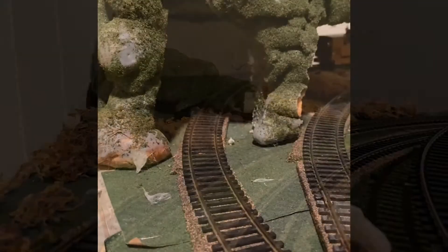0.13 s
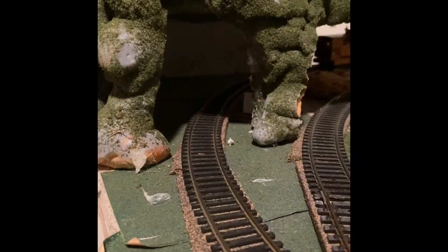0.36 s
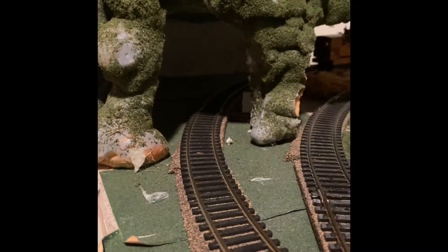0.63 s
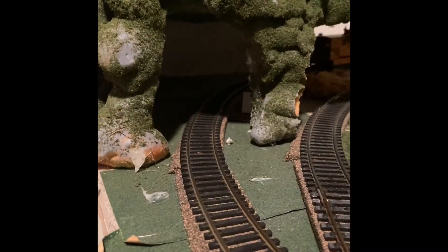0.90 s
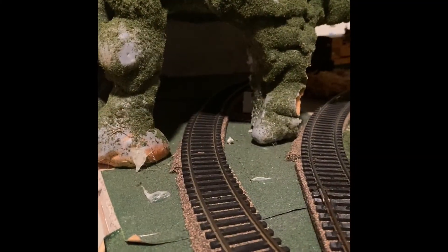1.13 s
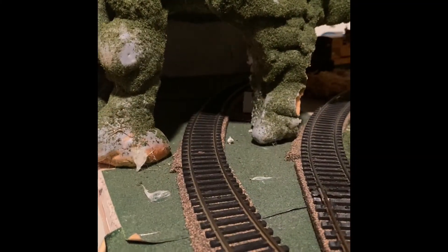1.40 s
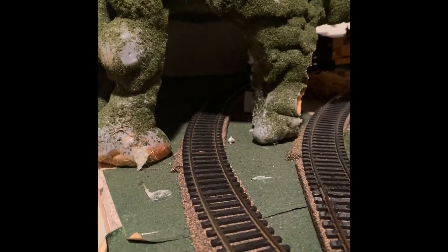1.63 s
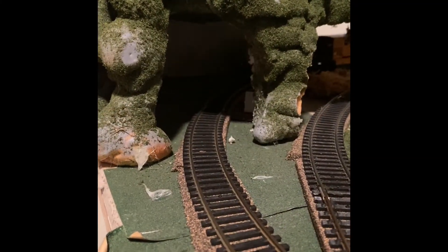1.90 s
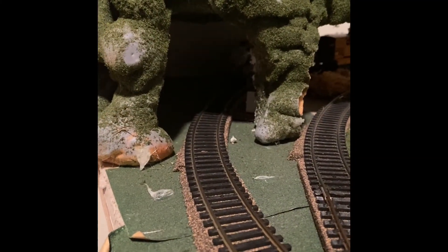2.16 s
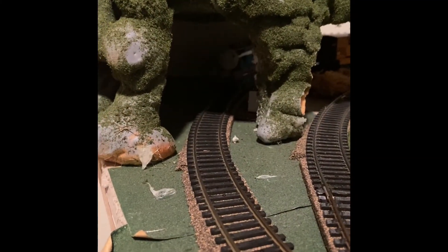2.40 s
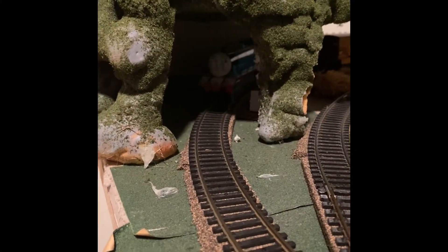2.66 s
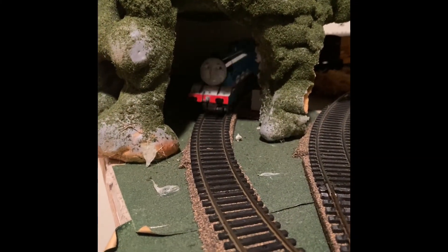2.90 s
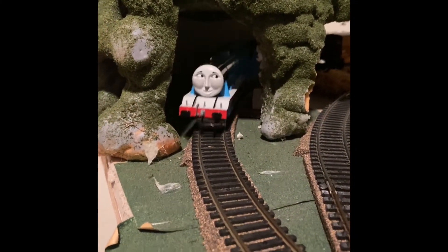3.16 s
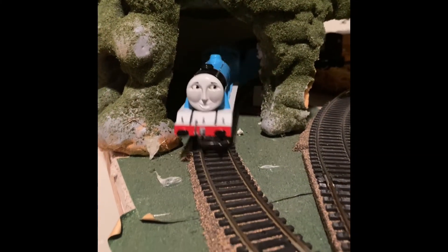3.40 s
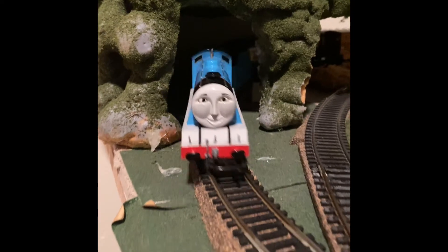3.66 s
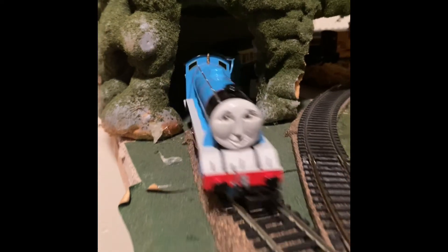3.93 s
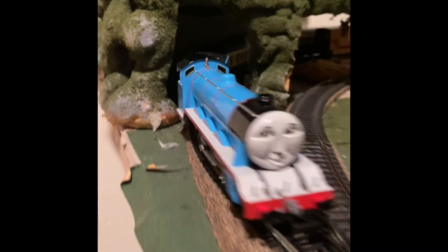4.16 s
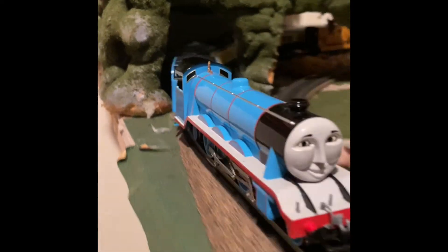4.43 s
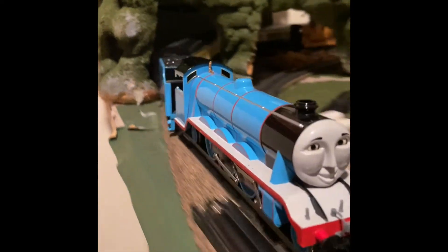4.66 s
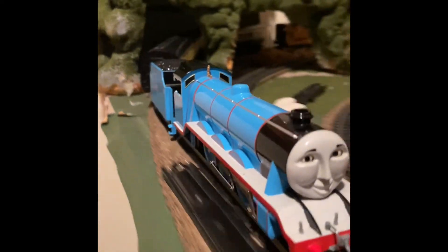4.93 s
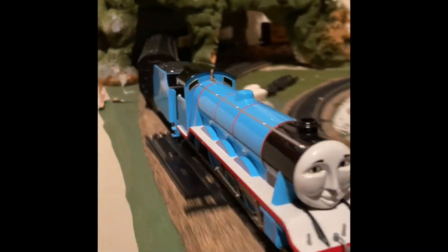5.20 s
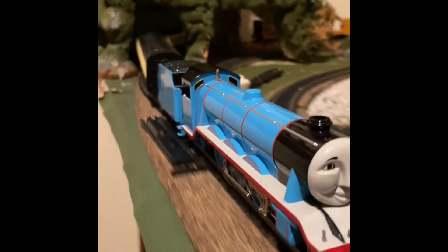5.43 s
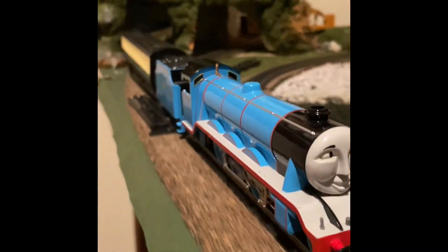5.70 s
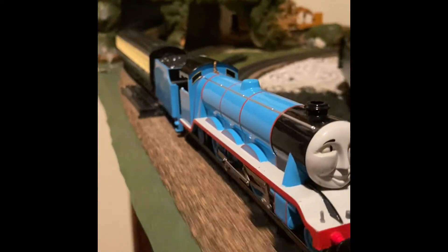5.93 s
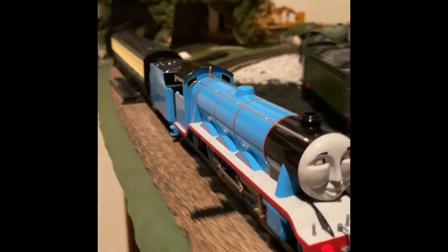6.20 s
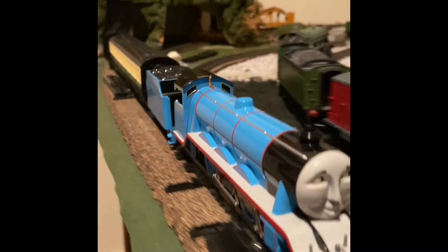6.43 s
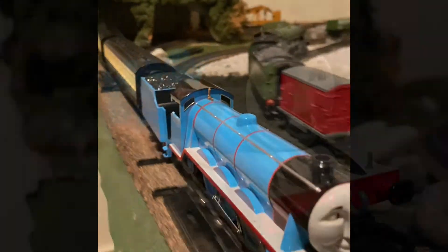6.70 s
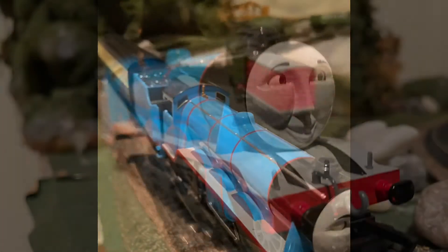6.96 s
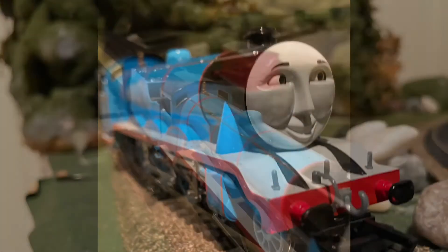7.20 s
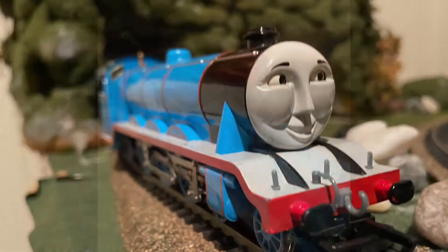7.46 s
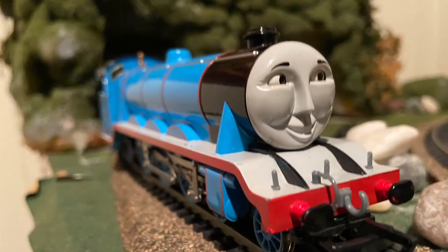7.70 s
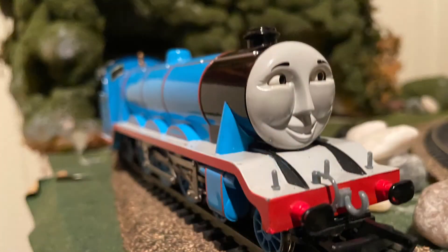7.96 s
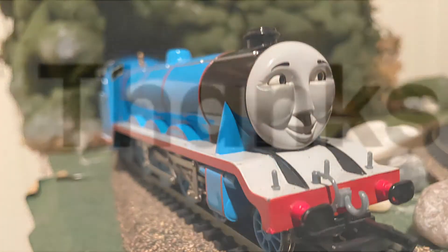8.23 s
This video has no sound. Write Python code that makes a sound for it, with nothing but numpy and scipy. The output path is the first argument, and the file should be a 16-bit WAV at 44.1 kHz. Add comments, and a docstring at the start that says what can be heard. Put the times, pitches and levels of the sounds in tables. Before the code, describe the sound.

A small electric model train approaches on an indoor wooden layout, soft rumble growing into brighter rolling hiss with crisp ticks and clanks, then quickly fading.

```python
"""Model train on a wooden layout

A small electric locomotive and its carriages draw near on an indoor baseboard, then fade out.
Rolling is coloured noise pulsed by small contacts: board rumble and drone, wheel roar, rail hiss.
Rail joints tick, and jolts and clanks ring resonant modes of wheels, frame, shell, board and table.
Random grains rattle, a faint motor hum comes and goes, and a diffuse hiss fades out at the start.
Left and right differ in level, likeness and phase along the spectrum; a short room tail follows hits.
"""
import sys
import numpy as np
from scipy import signal
from scipy.fft import rfft, irfft, next_fast_len
from scipy.io import wavfile
from scipy.ndimage import uniform_filter1d

SR = 44100
rng = np.random.default_rng(int(sys.argv[2]) if len(sys.argv) > 2 else 0)


def inscribe(sig):
    """Save sig as 16-bit PCM at rate SR to the path in sys.argv[1].

    A 1-D sig is mono; a 2-D sig holds one channel per row.
    Samples are clipped to [-1, 1] before scaling.
    """
    pcm = np.round(np.clip(np.atleast_2d(sig).T, -1, 1) * 32767)
    wavfile.write(sys.argv[1], SR, pcm.astype(np.int16))


def linear_from_db(decibels):
    """Turn decibels (scalar or array-like) into linear amplitude factors; 0 gives 1."""
    return 10 ** (np.asarray(decibels, float) / 20)


N = 367926

# train drawing near: t/s, rolling roar level/dB, rail hiss level/dB
TRAIN_LEVELS = [(0.0, -45.5, -61), (0.2, -46, -60), (1.2, -44.5, -59), (1.6, -43.5, -56), (2.2, -44.5, -53),
                (2.49, -44, -51.5), (2.75, -45, -51.5), (3.3, -42.5, -47), (4.0, -38.5, -43),
                (4.7, -41, -43.5), (5.02, -38.5, -43.5), (5.6, -41.5, -43.5), (5.96, -38.5, -40.5),
                (6.15, -42, -42), (6.7, -39, -41), (6.86, -42.5, -44), (7.15, -45.5, -44.5),
                (7.38, -53, -53.5)]
# shaking of the baseboard under the microphone: t/s, rumble level/dB, drone level/dB
BOARD_LEVELS = [(0.0, -51, -60), (0.9, -49, -56), (1.3, -47, -48), (1.62, -46, -46), (1.87, -39, -44.5),
                (2.14, -44.5, -49), (2.9, -48.5, -50.5), (3.35, -52.5, -53), (3.7, -50.5, -50.5),
                (3.85, -43, -49.5), (4.2, -45, -47.5), (5.0, -46, -48), (5.45, -44.5, -56),
                (5.9, -45, -48.5), (6.15, -52, -52), (7.15, -53, -58.5), (7.38, -57.5, -69.5)]
# ring of the hollow shell: t/s, level/dB
SHELL_LEVELS = [(0.0, -52.5), (0.4, -57.5), (2.03, -50.5), (2.8, -50), (3.49, -60), (3.65, -49.5),
                (4.21, -48.5), (4.62, -49), (5.5, -50.5), (5.75, -45.5), (6.0, -44), (6.25, -47.5),
                (6.4, -47), (6.84, -46.5), (7.12, -49), (7.38, -58)]
# motor hum in the board: t/s, lower partial level/dB, upper partial level/dB
HUM_LEVELS = [(0.0, -74, -71.5), (1.0, -66, -56), (1.5, -52.5, -59.5), (2.0, -56, -51.5), (2.4, -58, -48),
              (2.9, -62, -55), (3.4, -72.5, -60), (3.9, -48, -56), (4.3, -56.5, -53), (5.0, -56, -62),
              (5.6, -63.5, -63.5), (5.95, -50.5, -61), (6.2, -71, -68), (7.4, -70.5, -66.5)]

# noise colour of the wheel roar: f/Hz, relative density/dB per Hz
ROAR_SPECTRUM = [(300, -13.5), (420, -7), (520, 1), (660, 0.5), (820, -2.5), (1100, -4.5), (1600, -4),
                 (2000, -10.5), (2700, -16.5), (4000, -41)]
# noise colour of the rail hiss: f/Hz, relative density/dB per Hz
HISS_SPECTRUM = [(1500, -14), (2600, -6.5), (3250, 0), (3900, -.5), (4500, -4), (5200, -6.5), (6300, -8.5),
                 (8000, -10.5), (10000, -14), (12500, -19.5), (13500, -24)]
# noise colour of the board rumble: f/Hz, relative density/dB per Hz
RUMBLE_SPECTRUM = [(22, -24), (32, -11.5), (45, 0), (62, 2), (90, -9), (125, -7), (170, -9), (220, -12)]
# noise colour of the board drone: f/Hz, relative density/dB per Hz
DRONE_SPECTRUM = [(130, -19.5), (190, -8.5), (245, -6), (330, 3), (420, 0.5), (560, -14)]

# wheels over rail joints: t/s, flange peak level/dB, wheel ring over flange/dB, length/ms
JOINT_TICKS = [(0.095, -55, -15, 5), (0.228, -50, -5, 4), (0.349, -46, -9.5, 3.9), (1.2616, -49, 2.5, 3.4),
               (1.381, -45.5, -4.5, 4.2), (1.391, -42.5, -9, 2.7), (1.44, -53, 7, 13.5),
               (1.522, -35.5, -24, 1.03), (1.539, -42.5, -1, 6), (1.597, -55, 3.5, 2.5),
               (1.638, -44, -7, 2.7), (1.7722, -40.5, -4.5, 2.5), (1.803, -43.5, -4.5, 4),
               (1.8418, -41, -11, 2.2), (1.9, -38, 2.5, 1.9), (1.903, -40, 1.5, 5.1),
               (1.9388, -46.5, -2, 4.1), (1.9526, -55, 8.5, 2), (2.4574, -48, -2, 7.3),
               (2.5292, -40.5, -5.5, 0.91), (2.6, -42.5, -10, 5.4), (2.698, -37.5, -5.5, 6.8),
               (2.77, -41.5, -15.5, 3), (2.8267, -31, -12.5, 3.1), (2.926, -38, -9.5, 1.4),
               (2.9511, -29, -11.5, 2), (2.9613, -38.5, -4, 2.6), (2.995, -36.5, -9, 4.9),
               (3.007, -37.5, -1, 4.4), (3.06, -40.5, -8, 6), (3.1904, -37, -15.5, 3.5),
               (3.7462, -64, 6.5, 2), (3.8003, -38.5, 0.5, 3.2), (3.8705, -30, -14, 1.04),
               (3.9897, -29, -23.5, 2.1), (4.0576, -35.5, 3.5, 1.96), (4.078, -38.5, 5, 5),
               (4.191, -32.5, -7, 2.8), (4.305, -31.5, -16, 2.1), (4.4659, -34.5, -6.5, 2.9),
               (4.7575, -50.5, 7, 3.1), (4.872, -33, -3, 6.5), (4.9299, -21.5, -17, 3.1),
               (4.942, -32.5, -7.5, 2.3), (4.99, -30, -4, 2.8), (5.0326, -29.5, -10.5, 5.7),
               (5.0421, -23, -10, 5.1), (5.054, -36, -10, 3.8), (5.1427, -27.5, -9.5, 4.2),
               (5.1553, -35.5, 8, 1.6), (5.163, -34, -3, 2.2), (5.1906, -35, -1.5, 4.6),
               (5.273, -35, -13, 3.4), (5.314, -35.5, -3, 1.6), (5.3456, -33, -6.5, 2.4),
               (5.4212, -28, -9.5, 2.2), (5.4501, -22, -10, 1.3), (5.4656, -35, -3.5, 8.5),
               (5.5071, -25.5, -13, 4.6), (5.529, -32.5, -13, 3.6), (5.699, -37.5, 2, 2.6),
               (5.731, -30.5, -0.5, 5.8), (5.756, -33.5, -11.5, 2.6), (5.9155, -46, 17.5, 0.8),
               (5.9221, -27.5, -4, 8.3), (5.929, -34.5, 3, 3.7), (6.0034, -32.5, -3, 4.9),
               (6.0785, -28.5, -4, 3.1), (6.1038, -29.5, -4, 2.55), (6.182, -27, -19.5, 2.3),
               (6.2476, -35.5, 3, 1.1), (6.3087, -29.5, -5, 1.8), (6.3153, -33, -13.5, 3.8),
               (6.373, -40.5, -13, 2.9), (6.4665, -33.5, -9, 3.2), (6.7112, -44, 8, 3.3),
               (6.7662, -43, 11.5, 0.77), (6.827, -31, -11.5, 0.64), (6.9317, -37, -2.5, 3.1),
               (6.9625, -35.5, -5, 5.5), (7.1433, -51.5, 9, 4.3)]
# chance lesser ticks: rate/(1/s), level over hiss/dB, scatter/dB, wheel ring over flange/dB,
# shortest/ms, longest/ms
LESSER_TICKS = (9, 3, 3, -3, 1.5, 6)
# jolts: t/s, peak level/dB, place (0 board, 1 shell, 2 frame), length/ms
JOLTS = [(0.2306, -43, 0.8, 20), (0.3602, -38, 0.34, 8.7), (0.431, -42, .05, 12.3),
         (0.6024, -40.5, .05, 13), (0.921, -42.5, 1.8, 11), (1.0791, -42, 0.76, 6.6),
         (1.1454, -40, 1.2, 19.6), (1.598, -49, .3, 5), (1.778, -30.5, 0.26, 7.2),
         (1.8051, -31.5, 0.17, 9.5), (1.9024, -31.5, 2, 4.2), (1.9122, -34, 0.25, 10),
         (1.9412, -34.5, 1.6, 6), (1.954, -35, 0.59, 8), (2.0145, -44, 0.54, 3.7),
         (2.3894, -32.5, 0.87, 4.9), (2.4205, -33.5, 0.73, 7.1), (2.4542, -29, 0.68, 15.2),
         (2.486, -40, 1, 8), (2.519, -41.5, 0.97, 9.9), (2.5891, -36, 0.99, 15.5),
         (2.8197, -32.5, 0.18, 8.8), (3.0091, -30, 0.12, 13.7), (3.648, -35, 0.035, 16),
         (3.819, -31.5, 0.04, 12.6), (4.0347, -33, 0.77, 10), (4.07, -33, 1.3, 7), (4.1903, -34.5, .05, 12),
         (4.35, -31, 0.4, 7.2), (4.772, -31.5, 1.9, 7.9), (4.7879, -31.5, .05, 11.5),
         (4.872, -28.5, 1.16, 7), (4.879, -27, 1.5, 11), (4.907, -30.5, 2.1, 3), (4.93, -29.5, 2, 5.2),
         (4.994, -37, 0.96, 7.4), (5.041, -28.5, 1.3, 9.7), (5.058, -28, 1.6, 8), (5.072, -27.5, 1.4, 8),
         (5.1435, -34.5, 1.95, 6.3), (5.313, -35, 1.1, 2.8), (5.42, -32.5, 2, 14.4),
         (5.702, -31, 1.6, 10.8), (5.7327, -26, 1.7, 12), (5.819, -33, 1.8, 5.4), (5.916, -23, 2.1, 4.8),
         (5.926, -33.5, 1, 9.5), (5.946, -30, 1.5, 8.1), (5.9684, -35.5, 1.95, 9.6), (6.111, -33, 1.8, 12),
         (6.317, -34, 0.055, 15.3), (6.715, -33.5, 1.56, 21), (6.9, -36.5, 0.99, 9.5),
         (6.986, -36.5, 1.95, 8.3)]
# blows that make one mode of wheel or frame sing out: t/s, peak level/dB, f/Hz, length/ms
MODE_BLOWS = [(1.412, -44.5, 3250, 4), (1.75, -50, 3400, 6), (1.867, -43, 1110, 5), (1.902, -40, 1650, 4),
              (4.058, -32, 3740, 3.3), (4.873, -32.5, 3700, 8.1), (4.877, -27.5, 1510, 6),
              (4.931, -28.5, 1530, 3), (4.993, -28, 1044, 5.6), (5.042, -26.5, 1430, 6.1),
              (5.05, -35.5, 3670, 9), (5.1438, -21.5, 3250, 3.6), (5.142, -33, 1950, 4.4),
              (5.163, -33.5, 3500, 3.7), (5.189, -31, 3450, 5), (5.731, -27.5, 1900, 9),
              (6.9, -35, 1710, 5), (6.93, -40.5, 1465, 4.2)]
# short pings of the hollow shell mode alone: t/s, peak level/dB
SHELL_PINGS = [(2.683, -38), (3.9828, -40), (4.0425, -34), (5.7346, -29), (5.8215, -29.5), (5.9253, -33),
               (5.9464, -30), (5.9701, -30), (6.0336, -29.5), (6.1105, -31), (6.1509, -40), (6.1916, -38.5),
               (6.2351, -44), (6.759, -37), (6.8534, -36)]
# low thumps in the table: t/s, peak level/dB, length/ms
TABLE_THUMPS = [(1.15, -40, 16), (1.79, -45, 15), (1.848, -30, 12.3), (1.906, -29.5, 4.9), (2.06, -37, 15),
                (2.82, -48, 12), (3.01, -41, 9.8), (3.82, -30.5, 11), (4.21, -36.5, 12), (4.79, -38.5, 12),
                (5.72, -41.5, 16), (5.94, -40.5, 11.6)]
# loose wheels and gears: rate before clumping/(1/s), level over hiss/dB, size scatter/dB,
# lowest f/Hz, highest f/Hz, t60/cycles
GEAR_GRAINS = (600, -7.5, 4, 1500, 11500, 30)
# couplings and axles: rate before clumping/(1/s), level over roar/dB, size scatter/dB,
# lowest f/Hz, highest f/Hz, t60/cycles
COUPLING_GRAINS = (180, -6, 4.5, 450, 3000, 14)

# wheel resonances: f/Hz, mean level/dB, t60/s
WHEEL_RINGS = [(3340, -1, .009), (3633, -1, .008), (3840, -2, .006), (2850, -6, .005), (2350, -8, .005)]
# frame resonances: f/Hz, mean level/dB, t60/s
FRAME_RINGS = [(1420, -1, .025), (1530, -3, .02), (1650, -3, .02), (1900, 0, .02), (2020, -3, .015)]
# shell resonances: f/Hz, mean level/dB, t60/s
SHELL_RINGS = [(880, -2, .03), (970, -1, .03), (1087, -2, .03), (1230, -1, .025)]
# baseboard resonances: f/Hz, mean level/dB, t60/s
BOARD_RINGS = [(410, -7, .025), (490, -2, .03), (540, -2, .03), (600, -2, .03), (670, -4, .03)]
# resonances of the table under the board: f/Hz, mean level/dB, t60/s
TABLE_RINGS = [(62, -2, .09), (122, 0, .07), (190, -5, .04), (245, -5, .04), (325, -4, .04)]

# left against right: f/Hz, likeness/0-1, left over right level/dB
STEREO_BALANCE = [(0, .995, -.5), (150, .96, -2.3), (300, .87, -.7), (450, .75, .8), (700, .66, 2.9),
                  (1050, .85, 1.6), (1350, .94, -1.4), (1800, .3, -4.4), (2300, .65, -4.5), (2900, .6, -5),
                  (3300, .9, -1), (3700, .96, .8), (4400, 1, 0), (10200, 1, 0), (13000, .85, 0)]
# phase between left and right, stepped in the treble: f/Hz, left lead/rad
STEREO_PHASE = [(0, 0), (430, .55), (1030, -.55), (1650, .7), (2300, .95), (3200, .25), (3550, .5),
                (4650, 3.14), (5100, 3.14), (6650, 6.28), (7350, 6.28), (8750, 9.42), (9450, 9.42),
                (10650, 12.57), (11600, 12.57), (12600, 15.7)]

SHELL_HZ, SHELL_WIDTH_HZ = 1088.6, 30
FAR_DULLING = 0.011  # dB per octave lost above the wheel ring, per dB the hiss sinks
CLOSE_BRIGHTENING, ROAR_PIVOT_HZ = 0.38, 800  # dB per octave the roar gains, per dB hiss gains on it
LUMPS, DRONE_PATCHY_DB = .12, 1.8  # swell of drone and roar by larger contacts; drone band flicker
EDGE_DB, EDGE_SPREAD_DB = -14, 6  # bright edge over the flange at the usual tick; scatter
EDGE_GROWTH, USUAL_TICK_DB = 0.11, -27  # dB edge gains on flange, per dB above the usual tick
BOUNCE_MS, BOUNCE_DB = (-14, 16), (-15, -8)  # lighter touch beside a joint tick: offset, loss
NEXT_PART_DB, FAR_PART_DB = -12.5, -11.5  # jolt loss per part away, and its limit
TAIL_SHARE = .9  # decay time of a contact over its rise
CLANK_CYCLES = 24  # t60 in cycles
PING_MS, PING_T60_S = 5, .055
HUM_HZ, HUM_T60_S = (121, 242), .11
OPENING_DB, OPENING_S = -52.5, 0.46
ROOM_T60_S, ROOM_DB, ROOM_APART_DB, WALL_CUT_HZ = 0.25, -13.5, 2, 19000
BETWEEN_STEPS = .11  # most likeness lost where the treble phase is turning
UNTURNED_DB = -13  # part of each tick alike in both channels, without the phase turn
FADE_END_S, FADE_S = 7.595, .14
TOP_HZ = 13350


def rms_one(x):
    """Scales to rms 1."""
    return x / np.sqrt(np.mean(x ** 2) + 1e-20)


def in_time(rows):
    """Table columns as curves, one value a sample."""
    t_s, *columns = np.transpose(rows)
    return [np.interp(np.arange(N) / SR, t_s, c) for c in columns]


def drift(rate_hz):
    """Slow random wander of rms 1: low-passed noise, drawn every 40 samples."""
    r = np.exp(-80 * np.pi * rate_hz / SR)
    noise = rng.standard_normal(N // 40 + 2002)
    slow = signal.lfilter([1], [1, -2 * r, r * r], noise)[2000:]
    return np.interp(np.arange(N) / 40, np.arange(len(slow)), rms_one(slow - slow.mean()))


def band(x, low_hz, high_hz):
    """Butterworth band-pass."""
    return signal.sosfilt(signal.butter(2, [low_hz, high_hz], "band", fs=SR, output="sos"), x)


def ring(x, hz, t60_s):
    """Resonator: a unit click starts a decaying sine of initial height 1."""
    r, w = linear_from_db(-60 / (t60_s * SR)), 2 * np.pi * hz / SR
    return signal.lfilter([0, np.sin(w)], [1, -2 * r * np.cos(w), r * r], x + 1e-18)


def chatter(per_s, spread_db, length_ms):
    """Envelope of small uneven contacts that swell and die in a few ms."""
    sizes = linear_from_db(spread_db * np.minimum(rng.exponential(1, N), 3.0))
    born = rng.random(N) < per_s / SR
    r = np.exp(-1000 / (length_ms * SR))
    return signal.lfilter([np.e * (1 - r)], [1, -2 * r, r * r], sizes * born)


def modes(table):
    """A part that rings with its modes, each blow sharing its strength out anew."""
    def answer(contact):
        """Every mode, a pair of resonances at one pitch, rises to its own height."""
        # inner resonance is three times shorter: softens the onset
        rings = [ring(ring(contact, hz, t60_s / 3), hz, t60_s) for hz, _, t60_s in table]
        return sum(linear_from_db(db + rng.normal(0, 2)) * r / np.abs(r).max()
                   for r, (_, db, _) in zip(rings, table))
    return answer


def strike(events, parts):
    """Rough contacts swell and die; every part answers, its envelope peaking at the time given."""
    out, ms = np.zeros(N + SR), np.arange(-1024, 3072) * 1000 / SR
    for t_s, *peaks_db, length_ms in events:
        half_ms = np.hypot(length_ms, 1) / 2
        envelope = np.exp(-np.where(ms < 0, (ms / half_ms) ** 2, ms / (half_ms * TAIL_SHARE)))
        contact = rng.standard_normal(len(ms)) * envelope
        for part, peak_db in zip(parts, peaks_db):
            sound = part(contact)
            power = 2 * uniform_filter1d(sound ** 2, size=round(half_ms * SR / 500))
            at = round(t_s * SR) - power.argmax()
            out[at:at + len(ms)] += linear_from_db(peak_db) * sound / np.sqrt(power.max())
    return out[:N]


def rolling(spectrum, pulse, patchy_db, tilt_db=0, pivot_hz=WHEEL_RINGS[0][0]):
    """Two unrelated draws of coloured noise, pulsed by contacts, each band flickering on its own."""
    hz, level_db = np.transpose(spectrum)
    edges_hz = np.geomspace(hz[0], hz[-1], int(4 * np.log2(hz[-1] / hz[0])) + 2)
    white = rng.standard_normal((2, 2, N)) * pulse
    out = 0
    for k, (low_hz, high_hz) in enumerate(zip(edges_hz, edges_hz[1:])):
        colour_db = np.interp(np.log(low_hz * high_hz) / 2, np.log(hz), level_db)
        colour_db = colour_db + tilt_db * max(np.log2(low_hz / pivot_hz), 0)
        # neighbouring bands take different noise
        out = out + linear_from_db(colour_db + patchy_db * drift(8.6)) * band(white[k % 2], low_hz, high_hz)
    return rms_one(out)


def shell_ring():
    """Rolling noise keeps one hollow mode of the body ringing in uneven spurts."""
    spurts = (1 + 2.2 * chatter(18.0, 3.0, 5.0)) * linear_from_db(2.5 * drift(5.0))
    push = rng.standard_normal((2, N)) * spurts
    return rms_one(ring(push, SHELL_HZ, np.log(1000) / (np.pi * SHELL_WIDTH_HZ)))


def ticks(hiss_db):
    """Short metal scrapes: wheel ring, flange, bright edge; lesser ones follow the hiss by chance."""
    flange = signal.butter(2, [4400, 8500], "band", fs=SR)
    edge = signal.butter(2, [8500, 12800], "band", fs=SR)
    per_s, over_db, scatter_db, wheel_over_db, short_ms, long_ms = LESSER_TICKS
    luck = rng.random((100, 4))
    times_s = .1 - np.cumsum(np.log(luck[:, 0])) / per_s
    lesser = []
    for t_s, (_, a, b, c) in zip(times_s, luck):
        if t_s < FADE_END_S:
            flange_db = hiss_db[int(t_s * SR)] + over_db + scatter_db * (2 * a - 1)
            wheel_db = wheel_over_db + 2 * scatter_db * (2 * b - 1)
            lesser.append((t_s, flange_db, wheel_db, short_ms + c * (long_ms - short_ms)))
    for t_s, db, wheel_db, ms in JOINT_TICKS:
        bounce_s = t_s + rng.uniform(*BOUNCE_MS) / 1000
        lesser.append((bounce_s, db + rng.uniform(*BOUNCE_DB), wheel_db, 2 * ms))
    blows = []
    for t_s, db, wheel_db, ms in JOINT_TICKS + lesser:
        edge_db = db + EDGE_DB + EDGE_GROWTH * (db - USUAL_TICK_DB) + EDGE_SPREAD_DB * rng.normal()
        blows.append((t_s, db + wheel_db, db, edge_db, ms))
    return strike(blows, [modes(WHEEL_RINGS), lambda x: signal.lfilter(*flange, x),
                          lambda x: signal.lfilter(*edge, x)])


def knocks():
    """Duller jolts set board, shell and frame ringing, most of all the part they land on."""
    blows = []
    for t_s, db, place, ms in JOLTS:
        loss_db = np.maximum(NEXT_PART_DB * abs(place - np.arange(3)), FAR_PART_DB)
        blows.append((t_s, *(db + loss_db), ms))
    return strike(blows, [modes(BOARD_RINGS), modes(SHELL_RINGS), modes(FRAME_RINGS)])


def clanks():
    """Each blow rings one mode of its own, its decay set in cycles."""
    return sum(strike([(t_s, db, ms)], [modes([(hz, 0, CLANK_CYCLES / hz)])])
               for t_s, db, hz, ms in MODE_BLOWS)


def pings():
    """Short pings of the hollow shell mode."""
    blows = [(t_s, db, PING_MS) for t_s, db in SHELL_PINGS]
    return strike(blows, [modes([(SHELL_HZ, 0, PING_T60_S)])])


def thumps():
    """Low thumps ring the deep modes of the table."""
    return strike(TABLE_THUMPS, [modes(TABLE_RINGS)])


def rattle(rule, spectrum):
    """Dense uneven grains in clumps, each ringing at one of 32 pitches."""
    per_s, over_db, scatter_db, low_hz, high_hz, cycles = rule
    sizes = linear_from_db(scatter_db * np.minimum(rng.exponential(1, N), 3.0)) * rng.choice([-1, 1], N)
    born = rng.random(N) < per_s * linear_from_db(5.0 * drift(14.0)) / SR
    dealt = rng.integers(0, 32, N)
    hz, level_db = np.transpose(spectrum)
    rings = 0
    for k, pitch_hz in enumerate(np.geomspace(low_hz, high_hz, 32)):
        weight = linear_from_db(np.interp(pitch_hz, hz, level_db)) * np.sqrt(pitch_hz)
        rings = rings + weight * ring(sizes * born * (dealt == k), pitch_hz, cycles / pitch_hz)
    return linear_from_db(over_db) * rms_one(band(rings, low_hz, high_hz))


def hum():
    """Faint broken motor hum in the board: two partials of narrow noise."""
    out = 0
    for hz, level_db in zip(HUM_HZ, in_time(HUM_LEVELS)):
        narrow = ring(ring(rng.standard_normal(N), hz, HUM_T60_S), hz, HUM_T60_S)
        out = out + linear_from_db(level_db) * rms_one(narrow * linear_from_db(3.5 * drift(4.0)))
    return out


def opening():
    """Diffuse band of hiss, unrelated between left and right, fades out at the start."""
    fading = np.clip(1 - np.arange(N) / SR / OPENING_S, 0, 1)
    return linear_from_db(OPENING_DB) * fading * rms_one(band(rng.standard_normal((2, N)), 1500, 3600))


def room(x):
    """Dense reflections: decaying noise of unit energy."""
    t_s = np.arange(SR // 3) / SR
    tail = band(rng.standard_normal(len(t_s)), 73, WALL_CUT_HZ) * linear_from_db(-60 * t_s / ROOM_T60_S)
    return signal.fftconvolve(x, tail / np.sqrt(np.sum(tail ** 2)))[:N]


def left_right(shared, apart):
    """Left and right differ in level and likeness along the spectrum, with treble phase steps."""
    size = next_fast_len(N + 4096)
    shared, apart = rfft([shared, apart], size)
    hz = np.arange(len(shared)) * SR / size
    table_hz, likeness, left_db = np.transpose(STEREO_BALANCE)
    alike = np.clip(np.interp(hz, table_hz, likeness), 0, 1)
    balance_db = np.interp(hz, table_hz, left_db)
    lead_rad = np.interp(hz, *np.transpose(STEREO_PHASE))
    alike -= BETWEEN_STEPS * np.sin(lead_rad) ** 2 * (hz > table_hz[-4])
    shared, apart = shared * np.sqrt((1 + alike) / 2), apart * np.sqrt((1 - alike) / 2)
    # half the balance and lead on each side
    turn = linear_from_db(balance_db / 2) * np.exp(.5j * lead_rad)
    return irfft([(shared + apart) * turn, (shared - apart) / turn], size)[:, :N]


def scene():
    """Mixes steady rolling and hits, as parts shared by and differing between left and right."""
    roar_db, hiss_db = in_time(TRAIN_LEVELS)
    rumble_db, drone_db = in_time(BOARD_LEVELS)
    small, large = chatter(110.0, 4.5, 1.2), chatter(30.0, 3.0, 5.0)
    roar_tilt_db = CLOSE_BRIGHTENING * (hiss_db - roar_db + 5.0)
    hiss_tilt_db = FAR_DULLING * (hiss_db - hiss_db.max())

    steady = linear_from_db(rumble_db) * rolling(RUMBLE_SPECTRUM, 1, patchy_db=3.0)
    steady += linear_from_db(drone_db) * rolling(DRONE_SPECTRUM, 1 + LUMPS * large, patchy_db=DRONE_PATCHY_DB)
    steady += hum()
    steady += linear_from_db(roar_db) * rolling(ROAR_SPECTRUM, 1 + LUMPS * large + 0.17 * small, patchy_db=1.7,
                                     tilt_db=roar_tilt_db, pivot_hz=ROAR_PIVOT_HZ)
    steady += linear_from_db(hiss_db) * rolling(HISS_SPECTRUM, 1 + 0.26 * small + 0.32 * large, patchy_db=1.5,
                                     tilt_db=hiss_tilt_db)
    steady += linear_from_db(in_time(SHELL_LEVELS)[0]) * shell_ring()

    sharp = ticks(hiss_db)
    hits = sharp + knocks() + clanks() + pings() + thumps()
    hits += linear_from_db(hiss_db) * rattle(GEAR_GRAINS, HISS_SPECTRUM)
    hits += linear_from_db(roar_db) * rattle(COUPLING_GRAINS, ROAR_SPECTRUM)
    hits = band(hits, 40, 16000)

    shared = steady[0] + hits + linear_from_db(ROOM_DB) * room(hits)
    apart = steady[1] + linear_from_db(ROOM_APART_DB) * room(hits)
    fade = np.clip((FADE_END_S - np.arange(N) / SR) / FADE_S, 0, 1) ** 2
    return (left_right(shared, apart) + linear_from_db(UNTURNED_DB) * sharp + opening()) * fade


def low_pass(x):
    """Removes everything above the highest recorded frequency."""
    return signal.sosfilt(signal.butter(12, 13360, fs=SR, output="sos"), x)


def record(dry):
    """Steep low-pass cuts the top."""
    pair = signal.sosfilt(signal.cheby2(12, 40, TOP_HZ, fs=SR, output="sos"), dry)
    return low_pass(pair)


dry = scene()
out = record(dry)
inscribe(out)
```